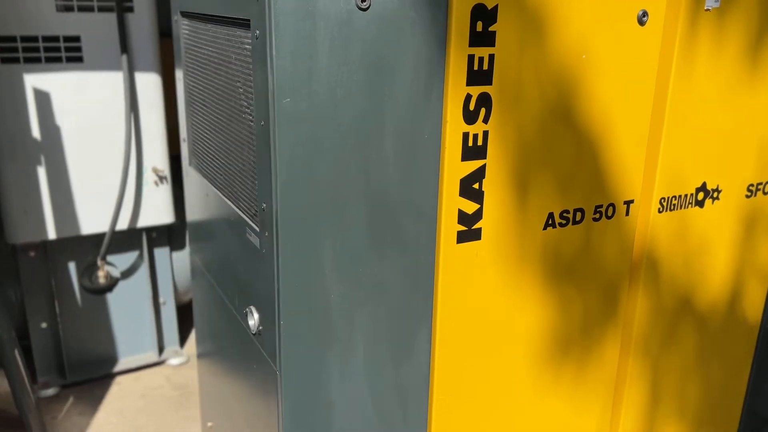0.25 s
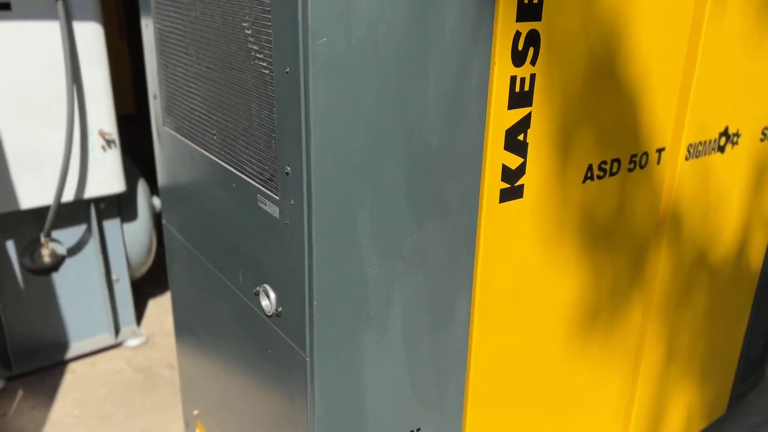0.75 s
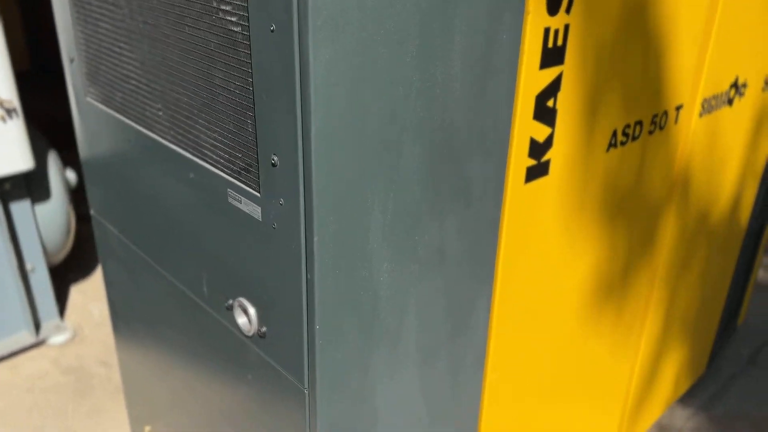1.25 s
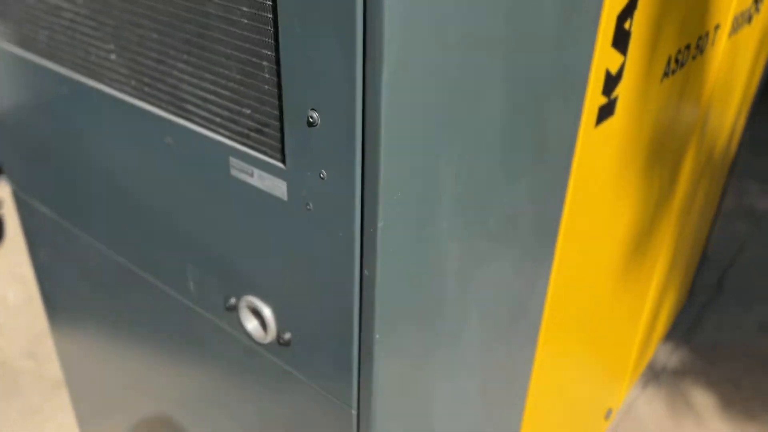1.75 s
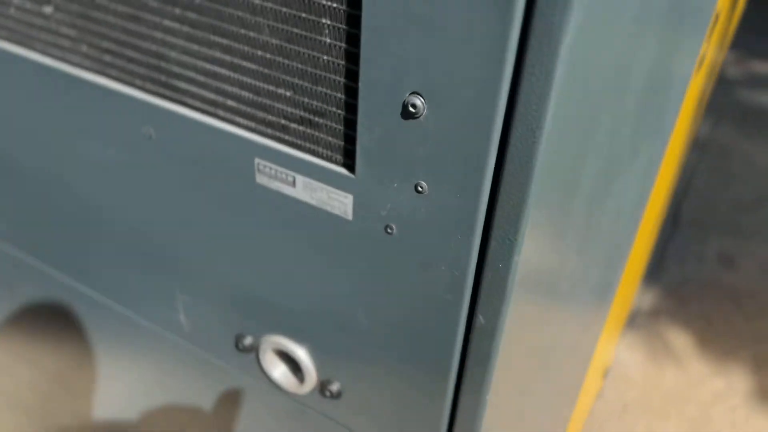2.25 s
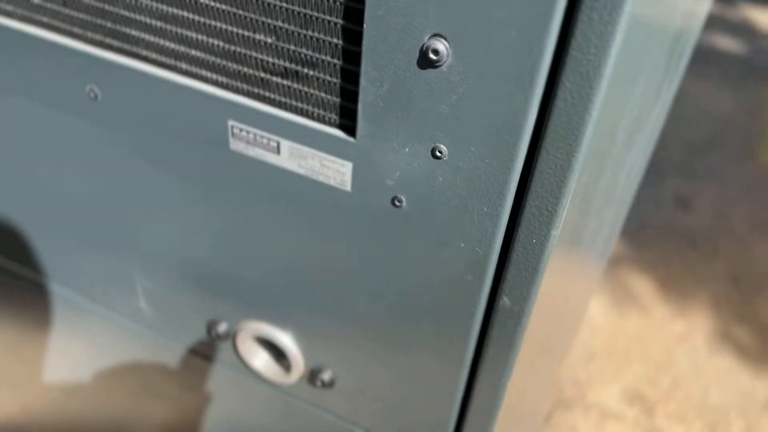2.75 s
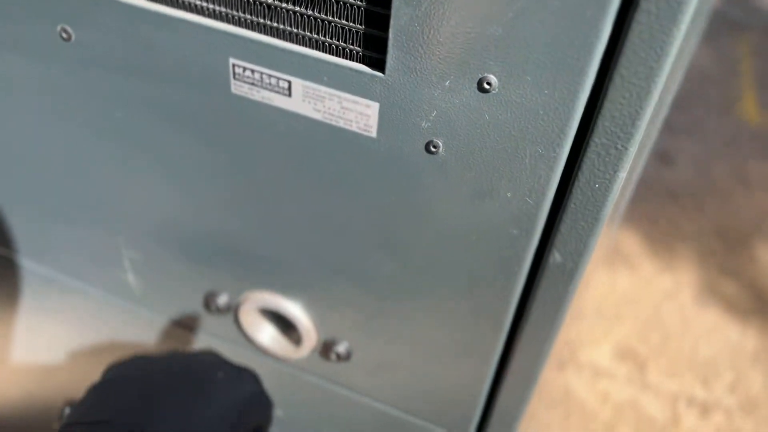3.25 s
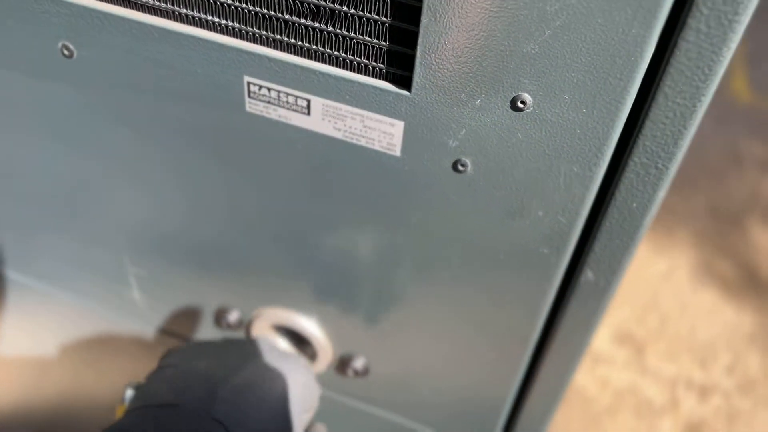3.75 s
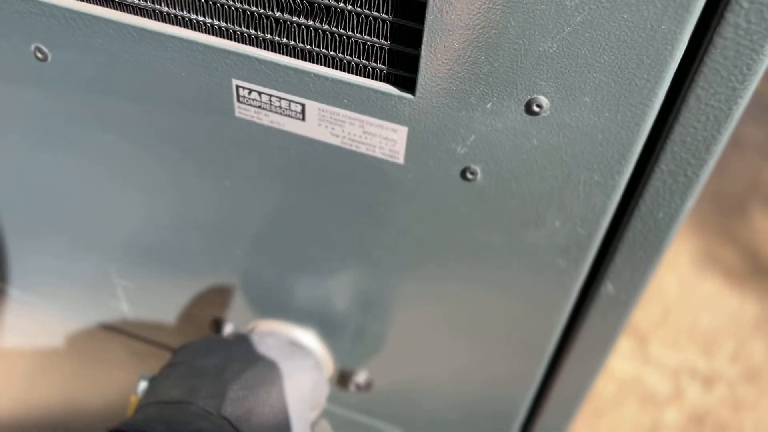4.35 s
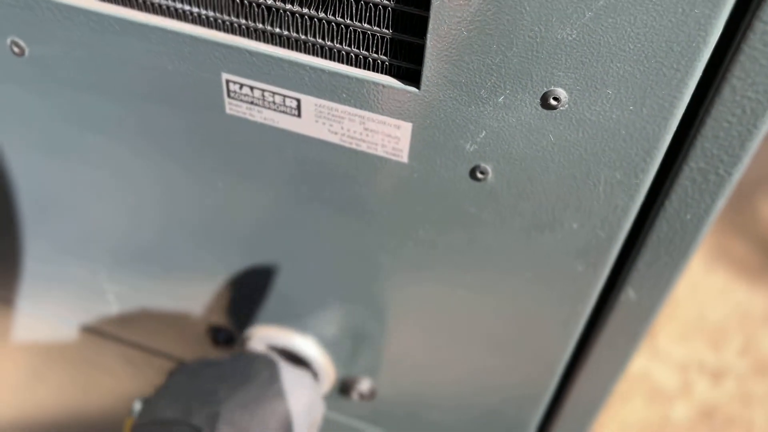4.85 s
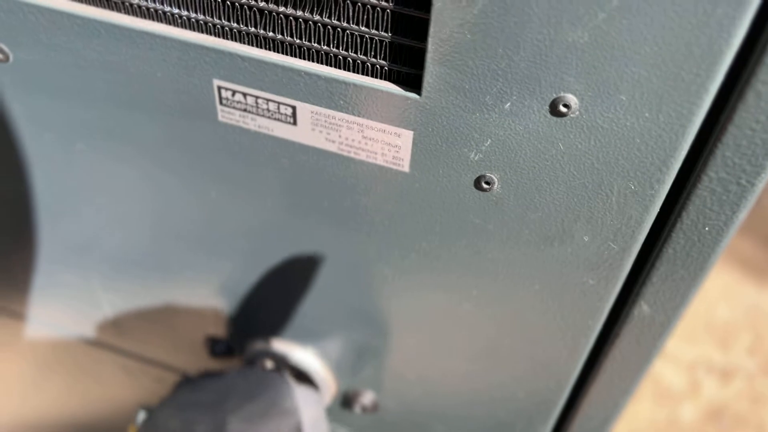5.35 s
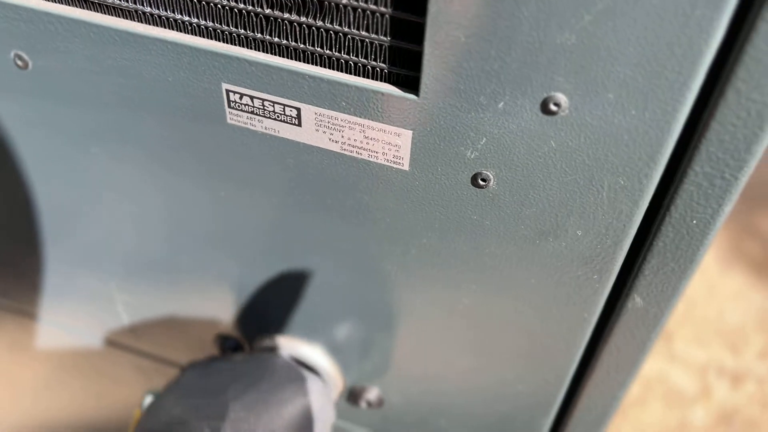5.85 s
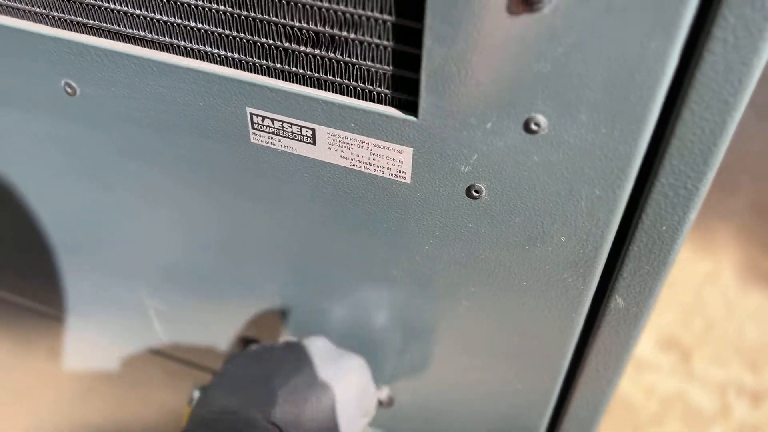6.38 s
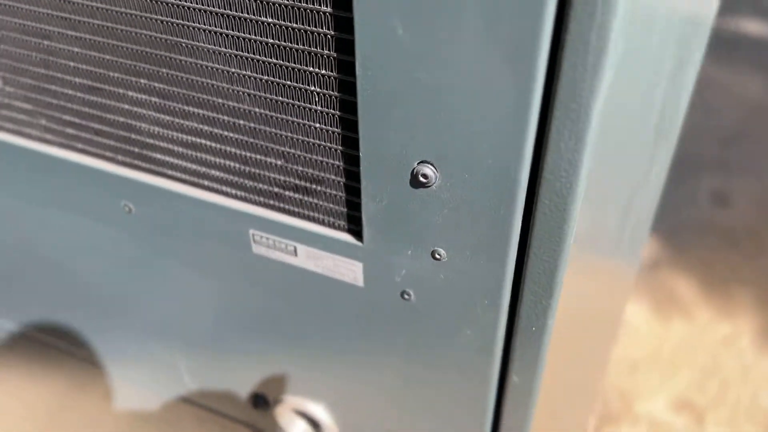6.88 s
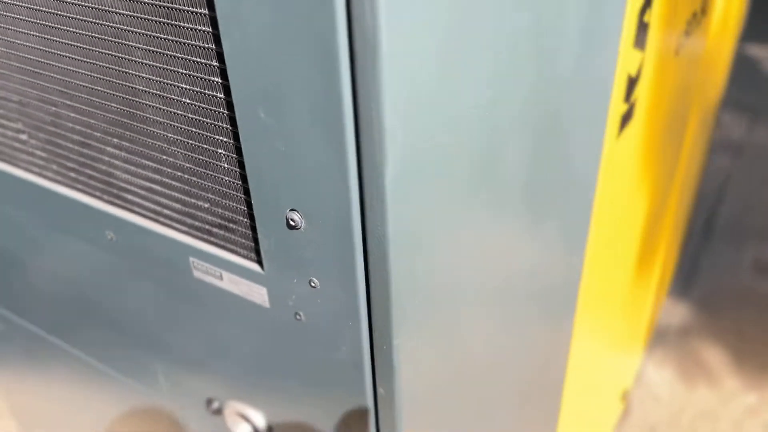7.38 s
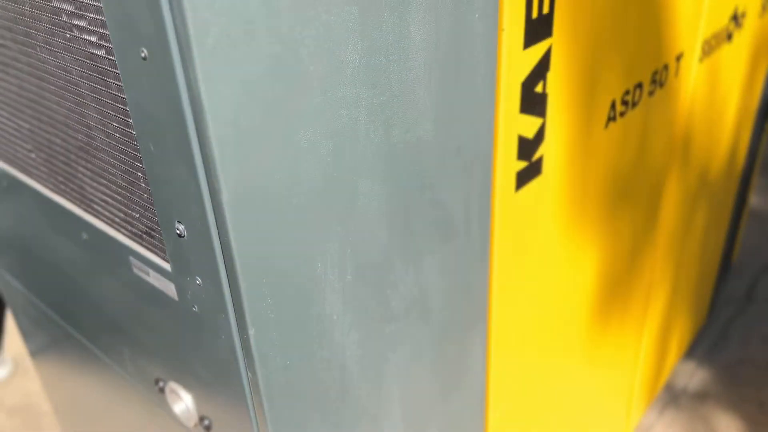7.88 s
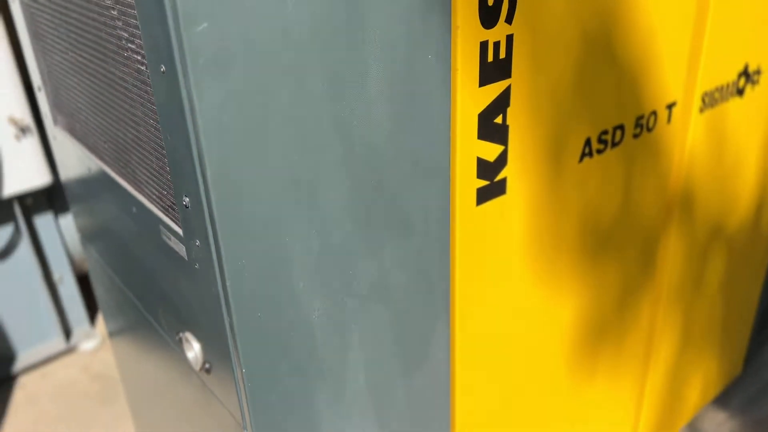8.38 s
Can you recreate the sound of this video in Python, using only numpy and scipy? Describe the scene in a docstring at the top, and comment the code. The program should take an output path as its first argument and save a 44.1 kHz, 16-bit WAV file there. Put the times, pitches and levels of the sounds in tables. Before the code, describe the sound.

A screw compressor hums and hisses as the listener walks up; escaping air climbs to a roaring, buffeting blast, stops, and leaves the machine much quieter.

```python
"""Screw compressor and venting air

Outdoors, rotor harmonics, fan noise and hiss come through a cabinet as the microphone walks up.
A gloved hand works at a side vent: escaping air (moving noise spectra) rushes up in pitch, blasts and stops.
Edge tones whistle at the glove; irregular pressure swings and rumble buffet the microphone.
The gain control turns down under the blast and holds, so the machine then sounds much quieter."""
import sys
import numpy as np
from scipy import signal
from scipy.fft import rfft, irfft, next_fast_len
from scipy.io import wavfile
from scipy.ndimage import uniform_filter1d, minimum_filter1d, map_coordinates

SR = 44100
rng = np.random.default_rng(int(sys.argv[2]) if len(sys.argv) > 2 else 0)


def dump(signal):
    """Clip the signal to [-1, 1] and save it as 16-bit WAV at the path in sys.argv[1]."""
    limited = np.clip(np.atleast_2d(signal).T, -1, 1)
    pcm = np.round(limited * 32767).astype(np.int16)
    wavfile.write(sys.argv[1], SR, pcm)


N = 380141
TIME = np.arange(N) / SR
FRAME, HOP = 1024, 256  # samples
BIN_HZ = np.fft.rfftfreq(FRAME, 1 / SR)[:, None]
FRAME_S = np.arange(N // HOP + 2) * HOP / SR
TOP_HZ = 15800

# walk to the vent and back: t/s, walked/m, nearness/0-1
WALK = [(0, 0.02, 0.05), (1.5, 0.65, 0.66), (2.3, 1, 0.9), (3.2, 1.03, 0.82), (6.4, 1.05, 1),
        (7.4, 1.55, 0.8), (8.62, 1.88, 0)]
# closing in and backing off: sets out t/s, arrives t/s, leaves t/s, back t/s
APPROACH = (0, 3.2, 6.45, 9.2)
# rounding the corner to the grille side and back: turning t/s, facing t/s, turning t/s, past t/s
FACING = (1.9, 2.25, 7.1, 7.5)
# stereo image by frequency: f/Hz, likeness/0-1, left lead/rad, left minus right/dB
STEREO = [(60, .96, 0, .1), (250, .97, .35, .5), (600, .9, 1.2, 5.2), (850, .78, 1.3, 5.7),
          (1200, .65, 1.3, 4), (1500, .67, 3.1, 1), (2000, .68, 6.4, .5), (2800, .77, 9.2, 0),
          (4000, .4, 13, 7), (5600, .38, 12.3, 7), (6800, .6, 12.9, 3.3), (8600, .8, 11, 1.5),
          (9400, 1, 9.5, 0), (10700, 1, 9.35, 0), (11200, .88, 8.35, 0), (15600, .9, 4.1, 0)]

ROTOR_HZ, ROTOR_SAG_HZ_PER_S = 211.7, 0.12
# rotor harmonics 1-5, standing along the walk, ahead of the stereo image:
# level/dB, antinode/m, antinode spacing/m, reflection/0-1, change/(dB/m), left minus right/dB
HARMONICS = [(-23, 0.55, 1.6, 0.11, -3.5, 1.5), (-35, 0.19, 0.66, 0.19, 0.3, -8),
             (-38.5, 0.61, 0.86, 0.42, 0, -1.5), (-43, .05, 1.46, 0.8, -3, -4),
             (-41, 0.15, .85, 0.93, -3, 0)]

# singing panel, along the walk: t/s, level/dB
PANEL_LEVELS = [(0, -39), (.3, -31), (.75, -35.5), (1, -28.5), (1.25, -28.5), (1.55, -43), (7.9, -45),
                (8.4, -34), (8.62, -36)]
PANEL_HZ, PANEL_KNOTS_PER_S = 1910, 45

# cooling fan spectrum: f/Hz, density/dB per Hz
FAN = [(20, -78), (40, -3), (62, 11), (86, 0.5), (115, -3), (170, 3.5), (300, -6), (370, 0.5), (470, -0.5),
       (560, -6), (750, -1), (1150, -3), (1450, 3), (1650, 1.5), (2100, -5.5), (4000, -60)]
# fan colour on the grille side: f/Hz, width/Hz, level/dB
INTAKE = [(1110, 160, 4.5), (1390, 93, -2.5), (326, 27, 5)]
FAN_FAR_DB, FAN_NEAR_GAIN_DB = -28, 3.5
# ringing cabinet spectrum, drawn around RING_HZ: f/Hz, density/dB per Hz
RING = [(1300, -70), (1660, -18), (1800, -2), (1900, 4), (1980, 6.5), (2070, 4), (2200, -4), (2350, -14),
        (2650, -11), (3600, -68)]
RING_HZ = 1980
# ring along the walk, loudest at a door seam passed twice: t/s, centre f/Hz, level/dB
RING_TRACK = [(0, 2040, -29.5), (.25, 2050, -28), (.7, 2020, -29), (1.15, 2100, -26), (1.52, 2034, -22),
              (1.8, 2005, -22), (2.12, 1980, -19.5), (2.3, 1910, -27.5), (2.55, 1880, -22),
              (3.2, 2000, -25), (4.2, 1939, -24.5), (5.2, 1950, -37), (6.4, 1930, -21), (6.78, 1980, -22),
              (7.15, 1890, -28), (7.6, 2060, -29), (8.15, 2030, -29), (8.62, 2040, -32)]
# machine hiss spectrum: f/Hz, density/dB per Hz
HISS = [(1500, -45), (2400, 0), (2900, 0), (3700, -2.5), (4650, -6), (5250, -3), (6000, -4.5), (7100, -7.5),
        (8400, -1.3), (9800, -5.5), (11200, -3.5), (12700, -1.5), (14300, -2.3), (15600, -2.8)]
# narrow peaks and dips in the hiss: f/Hz, width/Hz, level/dB
HISS_PEAKS = [(3680, 38, -4), (4160, 90, 1.5), (5210, 150, 3.5), (5570, 33, -10)]
HISS_FAR_DB, HISS_NEAR_GAIN_DB = -21.5, 4

# reaching hand: mirrors the hiss with a shrinking delay, and shades it
REACH_S, REACH_HALF_WIDTH_S = 3.45, 0.3
HAND_DELAY_MS, HAND_CLOSING_MS_PER_S = 0.285, 0.205  # delay at REACH_S
HAND_ECHO, HAND_SHADE_DB = 0.47, -3
# hand shading the hiss: start t/s, covered t/s, leaving t/s, gone t/s
SHADE = (2.75, 3.502, 6.5, 6.65)

# draught spectrum: f/Hz, density/dB per Hz
RUMBLE = [(20, -10), (56, 0), (85, -9), (150, -15), (400, -33), (1200, -60)]
# draughts on the microphone: start t/s, end t/s, level/dB
DRAUGHTS = [(5.04, 5.394, -19.5), (5.633, 5.71, -5), (5.9, 6.01, -4.5), (6.06, 6.086, -22),
            (6.55, 6.638, -29)]
DRAUGHT_FADE_S = 0.062
# gusts on the microphone: t/s, level/dB, length/s, first f/Hz, last f/Hz
GUSTS = [(5.512, -3.5, 0.036, 423, 45), (5.612, 2.5, 0.046, 211, 130), (5.655, -4, 0.038, 65, 42),
         (5.684, -7, 0.036, 200, 40), (5.815, 2.5, 0.028, 380, 32), (5.878, 8.5, .026, 421, 250),
         (5.9, 6.5, .036, 114, 38), (5.942, -5.5, .02, 210, 140), (5.964, 2.5, .017, 291, 147),
         (5.982, -3, .055, 131, 70)]
GUST_TAPER = 0.14  # tapered fraction of the length
GUST_UNEVEN, GUST_LURCH = 0.45, 0.25  # spread of swing size, of pace
GUST_RAGGED, GUST_FINER = 0.6, 2.2  # small eddies: weight, speed ratio

# edge tones: t/s, length/s, first f/Hz, last f/Hz, level/dB, pitch waver/0-1
WHISTLES = [(5.43, 0.14, 12700, 12300, -6, 0.1), (5.645, .08, 11100, 11400, -4, 0.04),
            (5.694, 0.14, 294.5, 325, -12.5, 0.05), (5.671, 0.113, 832, 984, -9.5, 0.04),
            (5.765, 0.075, 1480, 1400, -1.5, 0.2), (5.835, 0.052, 1305, 1416, -0.5, 0.03),
            (5.91, 0.14, 887, 934, -8.5, 0), (6.02, 0.049, 487, 440, -12, 0.05),
            (6.096, 0.069, 608, 660, -16, 0), (6.125, 0.048, 1354, 1430, -2, 0),
            (6.185, 0.11, 864, 732, -7, 0.03)]

# jet noise hump: multiple of eddy pitch, density/dB
EDDIES = [(.03, -9.5), (.25, -6.5), (.6, 0), (1, 3.5), (1.6, 1.5), (3, -6), (6, -16), (20, -55)]
# air jet hiss spectrum: f/Hz, density/dB per Hz
JET = [(600, -36), (2000, -5), (3500, 0), (4800, -1), (6200, -2), (7200, -5), (8500, 0), (9900, -6),
       (11300, -1.5), (12700, -1.5), (14300, -3.3), (15600, -3.8)]
# vent resonances and dips: f/Hz, width/Hz, level/dB
VENT = [(1830, 140, 4.5), (1637, 46, -16), (1430, 170, 3), (840, 48, 3), (2660, 620, 1)]
# resonances of the hollow under the glove: f/Hz, width/Hz, level/dB
HOLLOW = [(327, 33, 9.8), (510, 145, 8.2), (917, 41, 8.5), (1400, 90, 6.4)]
# hollow pitch as the glove shifts: t/s, f ratio
HOLLOW_TUNING = [(5.35, .95), (5.52, 0.96), (5.65, 0.95), (5.75, 0.99), (5.88, 1.01), (5.97, 0.89),
                 (6.2, 1.17)]
# resonances of the gap between glove and vent: f/Hz, width/Hz, level/dB
GAP = [(1920, 170, 5), (3550, 520, 4.5), (1050, 420, 2)]
GAP_PEAK_S, GAP_HALF_WIDTH_S = 4.45, 0.18
# glove cupping the vent: start t/s, closed t/s, opening t/s, open t/s
CUP = (4.55, 5.15, 5.999, 6.3)
CUPPING, VENT_DAMPING = 0.89, 0.35  # 0-1, of the closed glove
# swelling leak: t/s, rush level/dB
LEAK = [(2.1, -46), (2.7, -23.5), (3.3, -25), (3.85, -19.5), (4.15, -12.5), (4.52, -4), (4.75, -6.5),
        (5.2, -11), (5.6, -10.5)]
LEAK_START_S, LEAK_START_HZ, CLIMB_OCT_PER_S = 2.242, 97.4, 1.769
LEAK_TOP_S, SAG_OCT_PER_S = 4.69, 0.074
HISSING_HZ, HISS_DB_PER_OCT = 2280, 12  # leak hiss equals rush at HISSING_HZ
# faint early spurt dying away until 5.3 s, blast, last puff:
# start t/s, full t/s, origin of the falling line t/s, shut t/s, full-flow eddy f/Hz, rush/dB, hiss/dB
# the spurt's line originates before its start: past full, its flow drops at once to 0.7, then falls
BLASTS = [(4.69, 4.73, 4.5, 5.3, 3400, -14, -16), (5.248, 5.648, 6.1, 6.55, 1440, -2, -0.5),
          (6.517, 6.57, 6.63, 6.75, 635, -22, -20.5)]
PITCH_LAW, HISS_LAW = 0.13, 1.3  # powers of the flow


def amp(db):
    """Decibels to gain."""
    return 10 ** (np.asarray(db) / 20)


def unit(x):
    """Scale to rms 1."""
    return x / np.sqrt(np.mean(x ** 2) + 1e-20)


def along(points, hz, axis=1):
    """One table column, read on a log-frequency axis."""
    table = np.transpose(points)
    return np.interp(np.log(hz + 1e-6), np.log(table[0]), table[axis])


def curves(rows, t):
    """Every table column at the times t."""
    s, *columns = np.transpose(rows)
    return [np.interp(t, s, column) for column in columns]


def wobble(knots_per_s, t):
    """Smooth random curve through normal-distributed knots."""
    knots = rng.standard_normal(int(t[-1] * knots_per_s) + 4)
    return map_coordinates(knots, [t * knots_per_s], mode="nearest")


def envelope(start, full, falling, shut):
    """Rise and fall, 0-1, per frame; held at 1 between full and falling if falling is later."""
    return np.interp(FRAME_S, [start, full, falling, shut], [0, 1, 1, 0])


def passing(s, half_width):
    """Smooth rise and fall, 0-1, around time s, per frame."""
    return np.exp(-((FRAME_S - s) / half_width) ** 2)


def filtered(x, response):
    """Apply a complex frequency response."""
    size = next_fast_len(N + SR // 2)
    spectrum = rfft(x, size) * response(np.fft.rfftfreq(size, 1 / SR))
    return irfft(spectrum, size)[..., :N]


def low_cut(x, corner_hz):
    """Shed the deepest bass."""
    sos = signal.butter(4, corner_hz, "highpass", fs=SR, output="sos")
    return signal.sosfilt(sos, x)


def bumps(modes, tuning=1):
    """Peaks and dips as Gaussian bumps in dB over frequency."""
    return sum(db * np.exp(-.5 * ((BIN_HZ - hz * tuning) / width) ** 2) for hz, width, db in modes)


def noise(colour_db, level_db, patchy_db):
    """Stereo noise: moving spectrum, level curve, random gain patches, left-right likeness."""
    overlap = FRAME - HOP
    white = rng.standard_normal((2, N + FRAME))
    a, b = signal.stft(white, nperseg=FRAME, noverlap=overlap)[2][..., :len(FRAME_S)]
    # mixing two independent noises sets the left-right correlation
    turn = np.arccos(np.clip(along(STEREO, BIN_HZ), 0, 1)) / 2
    common, opposed = np.cos(turn) * a, np.sin(turn) * b
    pair = np.array([common + opposed, common - opposed])
    patches = uniform_filter1d(rng.standard_normal(a.shape), size=12, axis=0)
    patches = unit(uniform_filter1d(patches, size=14, axis=1))
    gain = amp(colour_db) * (BIN_HZ < TOP_HZ)
    gain = gain / np.sqrt(np.mean(gain ** 2, axis=0))
    gain = gain * amp(level_db + patchy_db * patches)
    return signal.istft(pair * gain, nperseg=FRAME, noverlap=overlap)[1][:, :N]


def echo_db(delay_ms, strength):
    """Comb that one reflection cuts into a spectrum, in dB."""
    r = np.clip(strength, 0, .9)
    return 10 * np.log10(1 + r * r + 2 * r * np.cos(2 * np.pi * BIN_HZ * delay_ms / 1000))


def yard(x, strength, count):
    """Echoes off equipment metres away draw fine steady strands through the noise."""
    lags = (SR * (.012 + .025 * rng.random(count))).astype(int)
    echoes = sum(np.roll(x, lag, axis=1) for lag in lags)
    return (x + strength * echoes) / np.sqrt(1 + count * strength ** 2)


def walls(strength, reach_ms, shift_ms, count):
    """Panels and ground reflect, less in the treble; the combs slide with the approach."""
    mirrored = strength / (1 + (BIN_HZ / 8000) ** 4)
    combs_db = 0
    for place, way in rng.random((count, 2)):
        delay_ms = reach_ms * (1 + 3 * place) + shift_ms * (.5 + way) * envelope(*APPROACH)
        combs_db = combs_db + echo_db(delay_ms, mirrored)
    return combs_db


def hand():
    """Hand's effect on the hiss, in dB: a rising comb, strongest in short waves, and a shadow."""
    delay_ms = HAND_DELAY_MS - HAND_CLOSING_MS_PER_S * (FRAME_S - REACH_S)
    short_waves = np.minimum(1, BIN_HZ / 11000) ** 2
    mirrored = HAND_ECHO * passing(REACH_S, REACH_HALF_WIDTH_S) * short_waves
    return echo_db(delay_ms, mirrored) + HAND_SHADE_DB * envelope(*SHADE)


def cabinet():
    """Fan noise and hiss grow with nearness, the throbbing ring shifts; walls and hand colour them."""
    _, near = curves(WALK, FRAME_S)
    combs_db = walls(strength=.18, reach_ms=1.2, shift_ms=.7, count=6)

    fan_colour_db = along(FAN, BIN_HZ) + envelope(*FACING) * bumps(INTAKE)
    fan = noise(fan_colour_db, FAN_FAR_DB + FAN_NEAR_GAIN_DB * near, patchy_db=1.24)
    fan = low_cut(fan, corner_hz=45.7)

    centre_hz, ring_db = curves(RING_TRACK, FRAME_S)
    ring = noise(along(RING, BIN_HZ * RING_HZ / centre_hz) + combs_db, ring_db, patchy_db=0.5)
    throb = 1 + 0.018 * np.sin(2 * np.pi * 10 * TIME + wobble(2.77, TIME))
    buzz = 1 + 0.13 * np.sin(2 * np.pi * 109 * TIME + wobble(2.37, TIME))
    ring = ring * throb * buzz

    hiss_db = HISS_FAR_DB + HISS_NEAR_GAIN_DB * near + hand() + 0.061 * wobble(10, FRAME_S)
    hiss = noise(along(HISS, BIN_HZ) + bumps(HISS_PEAKS) + combs_db, hiss_db, patchy_db=1.35)
    return yard(fan, strength=0.096, count=5) + yard(ring, strength=0.14, count=5) + hiss


def panel():
    """One lightly damped panel mode sings a narrow, randomly swinging strand below the ring."""
    level_db, = curves(PANEL_LEVELS, TIME)
    swing = wobble(PANEL_KNOTS_PER_S, TIME) + 1j * wobble(PANEL_KNOTS_PER_S, TIME)
    strand = np.real(swing * np.exp(2j * np.pi * PANEL_HZ * TIME))
    return amp(level_db) * unit(strand)


def screws():
    """Rotor pulsation: harmonics of a nearly constant speed, each with its standing wave."""
    speed_hz = ROTOR_HZ - ROTOR_SAG_HZ_PER_S * TIME + 0.15 * wobble(4.05, TIME)
    phase = 2 * np.pi * np.cumsum(speed_hz) / SR
    walked_m, _ = curves(WALK, TIME)
    out = np.zeros((2, N))
    for k, (db, antinode_m, spacing_m, reflection, db_per_m, left_db) in enumerate(HARMONICS, 1):
        turns = (walked_m - antinode_m) / spacing_m
        standing = np.abs(1 + reflection * np.exp(2j * np.pi * turns))
        level = amp(db + db_per_m * walked_m + 0.2 * wobble(14, TIME))
        sides = amp([[left_db / 2], [-left_db / 2]])
        tone = np.sqrt(2) * np.sin(k * phase + 2 * np.pi * rng.random())
        out += sides * standing * level * tone
    return out


def gust(length_s, first_hz, last_hz):
    """Irregular pressure swings gliding between two rates, with smaller eddies riding on them."""
    size = int(length_s * SR)
    large, small = rng.standard_normal((2, 400))
    swings = (-1) ** np.arange(len(large)) + GUST_UNEVEN * large
    pace = np.exp(GUST_LURCH * wobble(first_hz, TIME[:size]))
    half_cycles = 2 * np.cumsum(np.geomspace(first_hz, last_hz, size) * pace) / SR
    pressure = map_coordinates(swings, [half_cycles])
    pressure = pressure + GUST_RAGGED * map_coordinates(small, [GUST_FINER * half_cycles])
    return unit(pressure * signal.windows.tukey(size, GUST_TAPER))


def buffets():
    """Stray air hits the microphone: gusts that slow as they pass, over a rumble."""
    out = np.zeros(N)
    for s, db, length_s, first_hz, last_hz in GUSTS:
        swings = gust(length_s, first_hz, last_hz)
        out[round(s * SR):][:len(swings)] += amp(db) * swings
    draught = 0
    for start, end, db in DRAUGHTS:
        draught = draught + amp(db) * envelope(start - DRAUGHT_FADE_S, start, end, end + DRAUGHT_FADE_S)
    return out + noise(along(RUMBLE, BIN_HZ), 20 * np.log10(draught + 1e-6), patchy_db=1.5)


def whistles():
    """Brief gliding edge tones, most of them wavering, where the jet grazes the glove."""
    out = np.zeros(N)
    for s, length_s, first_hz, last_hz, db, waver in WHISTLES:
        t = np.arange(int(length_s * SR)) / SR
        hz = np.geomspace(first_hz, last_hz, len(t)) * (1 + waver * wobble(first_hz / 4, t))
        tone = np.sqrt(2) * np.sin(2 * np.pi * np.cumsum(hz) / SR)
        out[round(s * SR):][:len(t)] += amp(db) * signal.windows.tukey(len(t), .5) * tone
    return out


def leak():
    """Slow leak: eddy pitch climbs steadily, then sags; hiss grows with pitch. Pitch/Hz, two gains."""
    rush_db, = curves(LEAK, FRAME_S)
    climbed_s = np.clip(FRAME_S, LEAK_START_S, LEAK_TOP_S) - LEAK_START_S
    sagged_s = np.maximum(0, FRAME_S - LEAK_TOP_S)
    hz = LEAK_START_HZ * 2 ** (CLIMB_OCT_PER_S * climbed_s - SAG_OCT_PER_S * sagged_s)
    rush = amp(rush_db) * (FRAME_S > LEAK_START_S) * (FRAME_S < LEAK[-1][0])
    return hz, rush, rush * amp(HISS_DB_PER_OCT * np.log2(hz / HISSING_HZ))


def blast(start, full, falling, shut, hz, rush_db, hiss_db):
    """One blast's eddy pitch/Hz, rush gain and hiss gain, all following its flow."""
    flow = envelope(start, full, falling, shut) + 1e-6
    return hz * flow ** PITCH_LAW, amp(rush_db) * flow, amp(hiss_db) * flow ** HISS_LAW


def escaping_air():
    """Turbulent jet: its hump climbs as eddies shrink, full flow hisses; the strongest flow leads the pitch."""
    flows = [leak()] + [blast(*row) for row in BLASTS]
    hz, rushes, hisses = np.stack(flows, axis=1)
    eddy_hz = np.average(hz, weights=rushes ** 2, axis=0)
    rush_db, hiss_db = 10 * np.log10(np.sum(np.square([rushes, hisses]), axis=1))
    flutter_db = 0.6 * wobble(16, FRAME_S)

    cupped = envelope(*CUP)
    vent_db = (1 - VENT_DAMPING * cupped) * bumps(VENT)
    hollow_db = CUPPING * cupped * bumps(HOLLOW, *curves(HOLLOW_TUNING, FRAME_S))
    gap_db = passing(GAP_PEAK_S, GAP_HALF_WIDTH_S) * bumps(GAP)
    rush_colour_db = along(EDDIES, BIN_HZ / eddy_hz) + vent_db + hollow_db + gap_db

    rush = noise(rush_colour_db, rush_db + flutter_db, patchy_db=-0.22)
    hiss = noise(along(JET, BIN_HZ), hiss_db + flutter_db, patchy_db=1.2)
    return rush + hiss


def stereo_image(hz):
    """Lead and level difference between left and right, by frequency."""
    lead_rad = along(STEREO, hz, axis=2)
    tilt = amp(along(STEREO, hz, axis=3))
    pair = np.array([tilt * np.exp(.5j * lead_rad), np.exp(-.5j * lead_rad)])
    return pair * np.sqrt(2 / (1 + tilt ** 2))


def scene():
    """Machine and escaping air in the stereo image, plus buffeting at the microphone."""
    machine = cabinet() + panel() + screws()
    air = whistles() + escaping_air()
    return filtered(machine + air, stereo_image) + buffets()


def gain_control(x, ceiling_db, attack_s):
    """Gain falls when the level above the bass passes the ceiling, then holds."""
    power = np.mean(filtered(x, lambda hz: hz > 1000) ** 2, axis=0)
    keep = np.exp(-1 / (attack_s * SR))
    level = np.sqrt(signal.lfilter([1 - keep], [1, -keep], power) + 1e-12)
    return x * np.minimum.accumulate(np.minimum(1, amp(ceiling_db) / level))


def limiter(x, top, size):
    """Smoothly duck the tallest peaks."""
    needed = top / np.maximum(np.abs(x).max(axis=0), top)
    return x * uniform_filter1d(minimum_filter1d(needed, 2 * size), size)


def record(dry):
    """Low cut, gain control, peak limiter and band limit."""
    held = gain_control(low_cut(dry, corner_hz=37.3), ceiling_db=-15.0, attack_s=0.046)
    safe = limiter(held, top=.9, size=200)
    return filtered(safe, lambda hz: hz < TOP_HZ)


dry = scene()
out = record(dry)
dump(out)
```